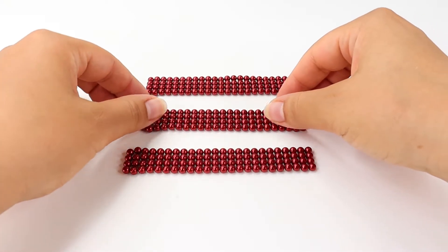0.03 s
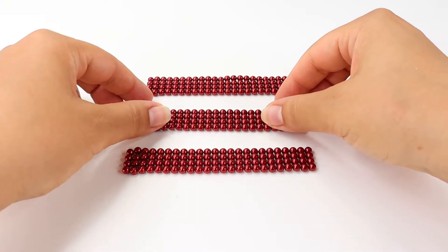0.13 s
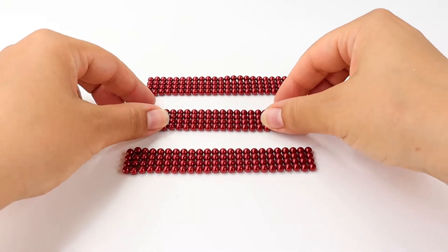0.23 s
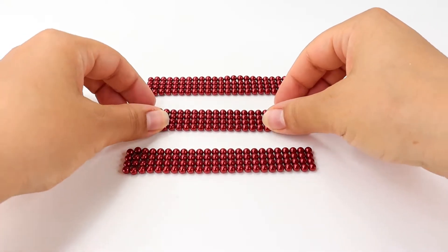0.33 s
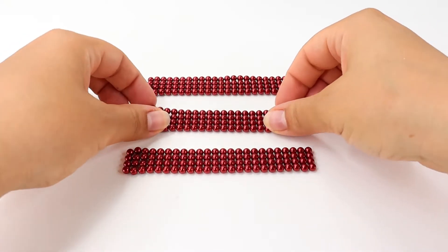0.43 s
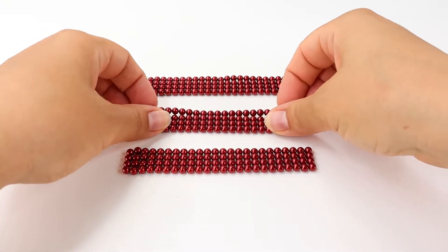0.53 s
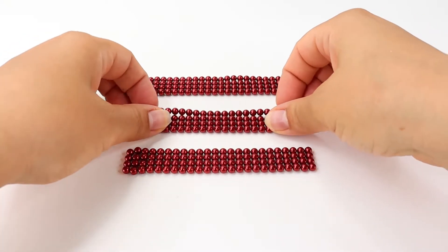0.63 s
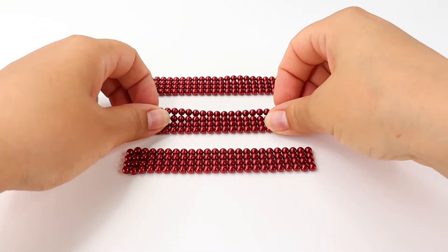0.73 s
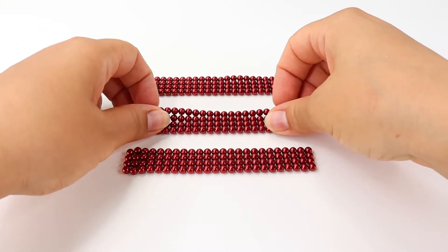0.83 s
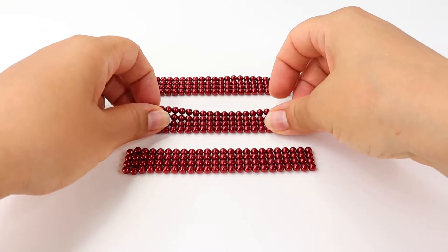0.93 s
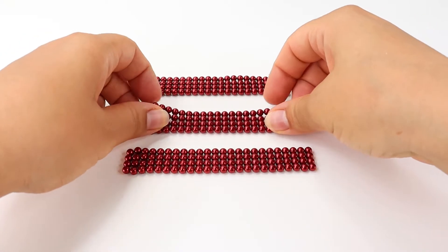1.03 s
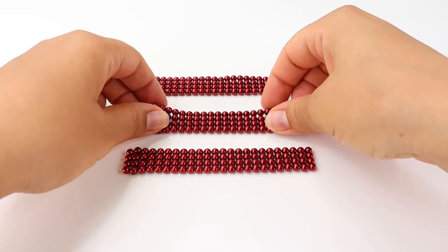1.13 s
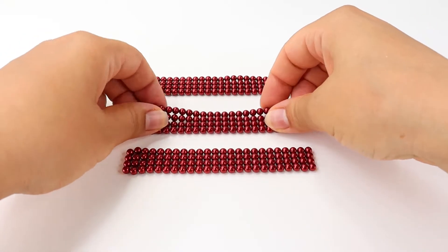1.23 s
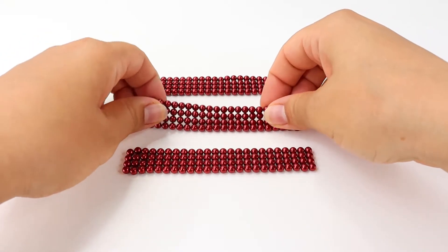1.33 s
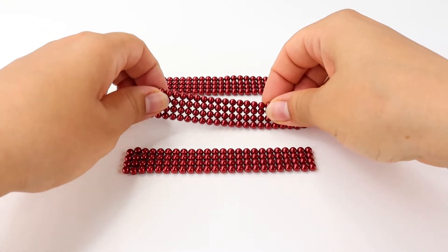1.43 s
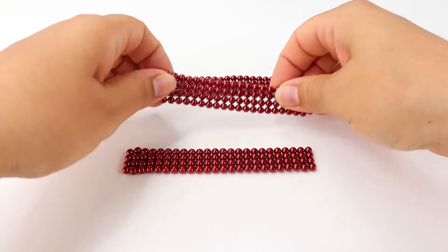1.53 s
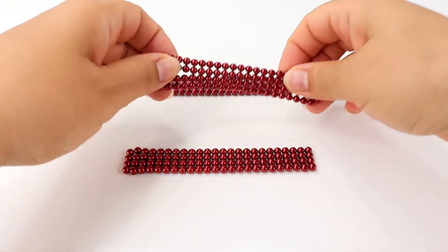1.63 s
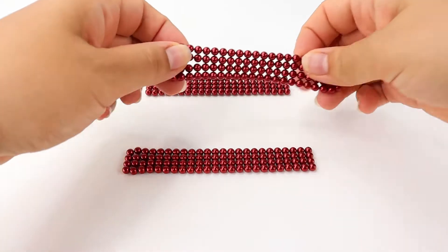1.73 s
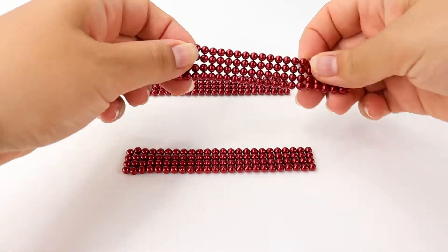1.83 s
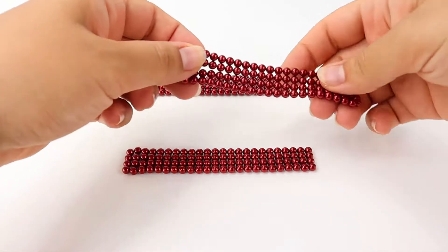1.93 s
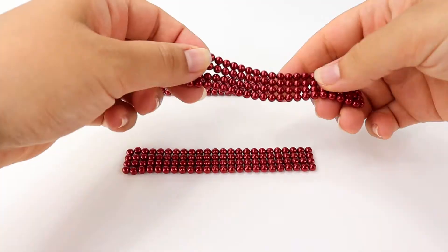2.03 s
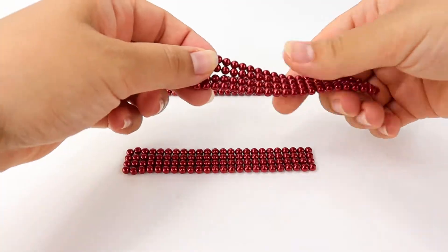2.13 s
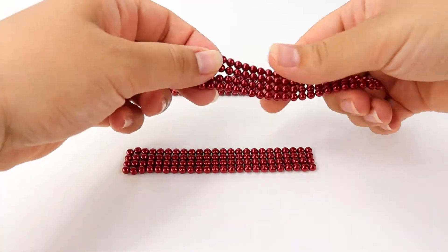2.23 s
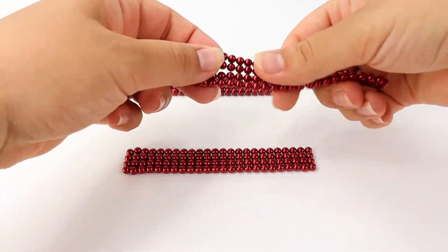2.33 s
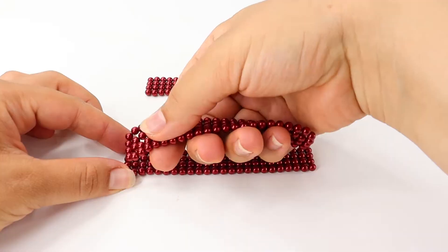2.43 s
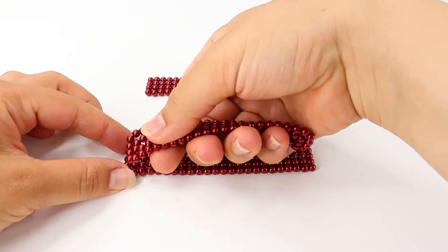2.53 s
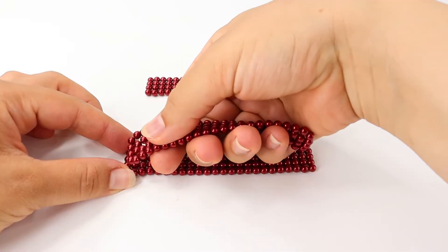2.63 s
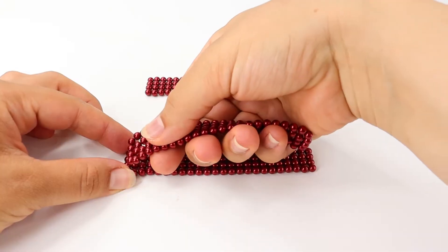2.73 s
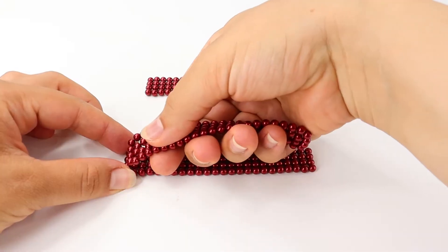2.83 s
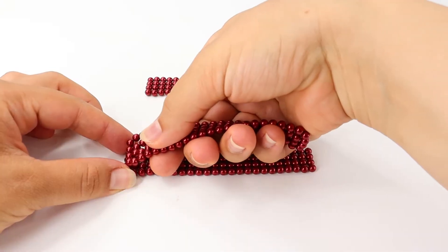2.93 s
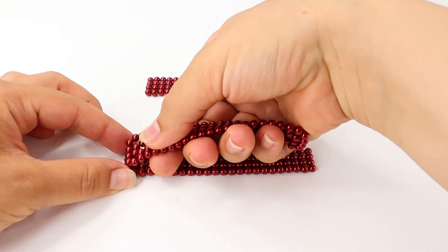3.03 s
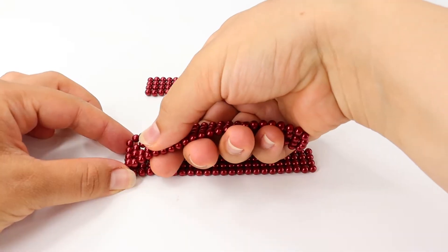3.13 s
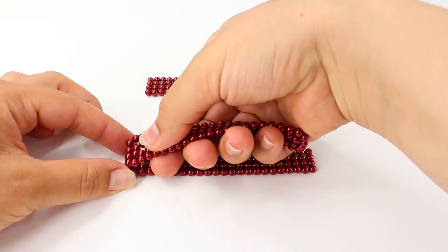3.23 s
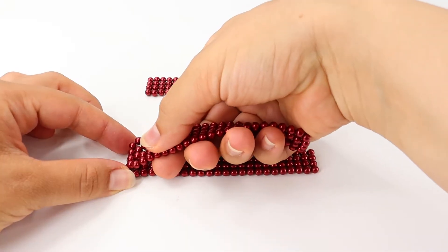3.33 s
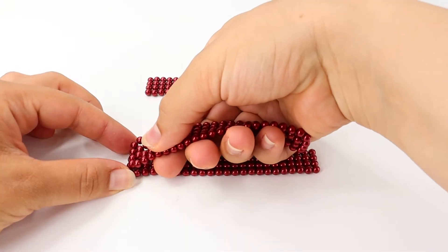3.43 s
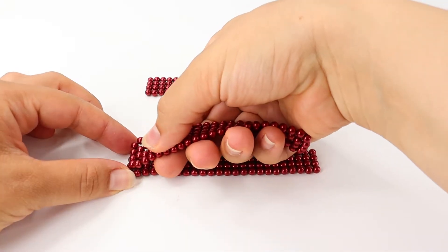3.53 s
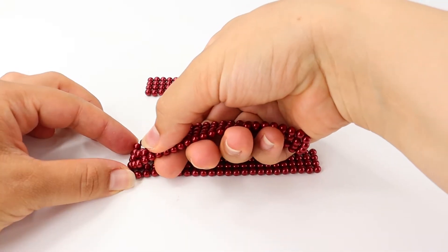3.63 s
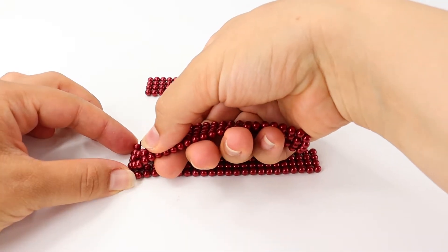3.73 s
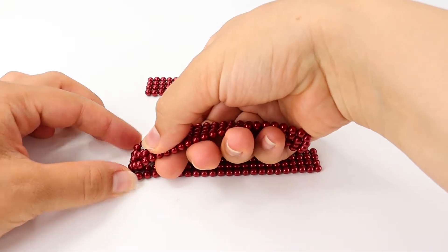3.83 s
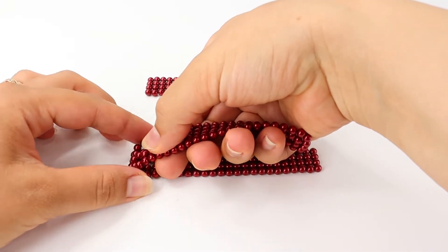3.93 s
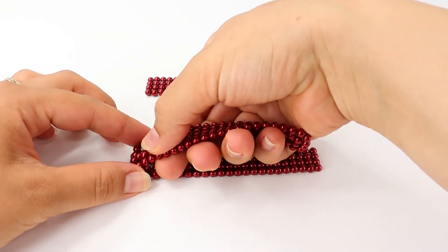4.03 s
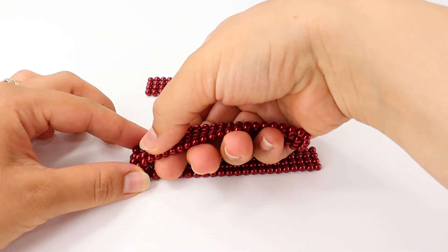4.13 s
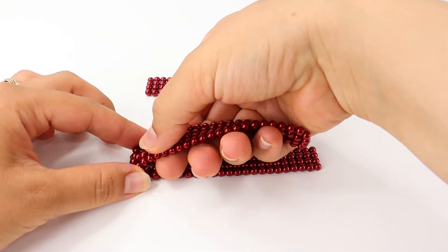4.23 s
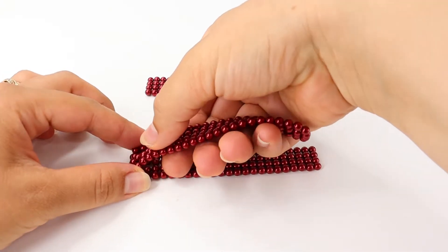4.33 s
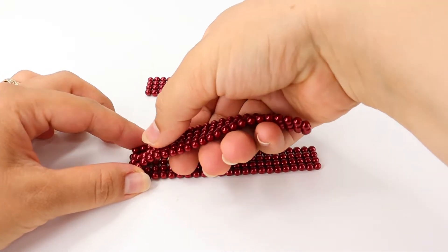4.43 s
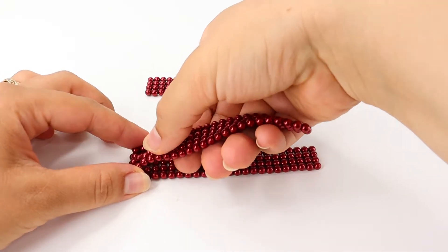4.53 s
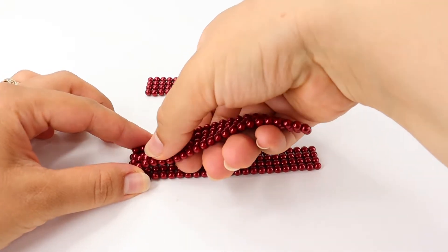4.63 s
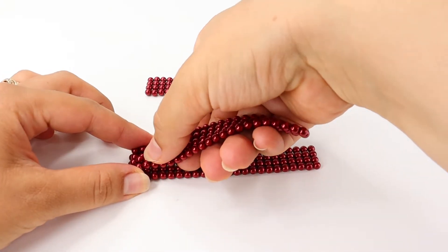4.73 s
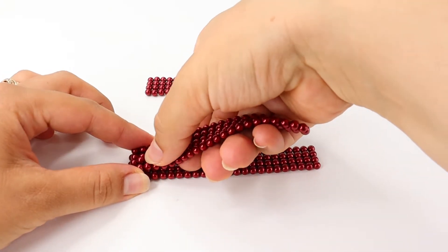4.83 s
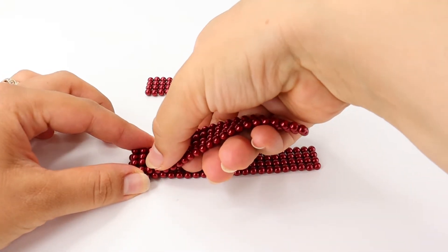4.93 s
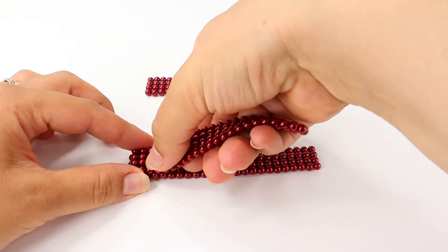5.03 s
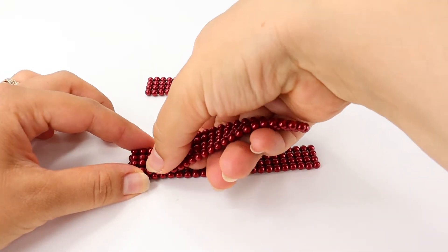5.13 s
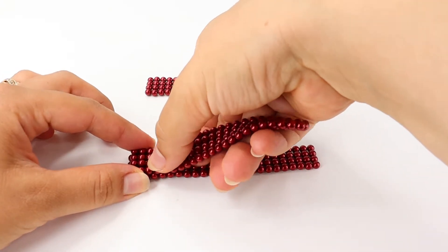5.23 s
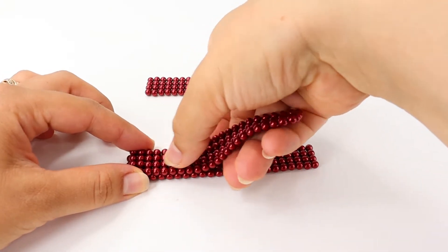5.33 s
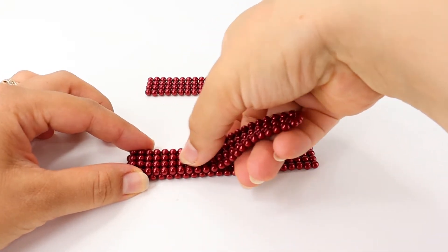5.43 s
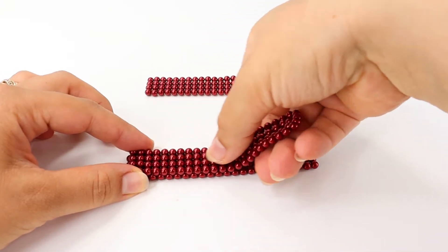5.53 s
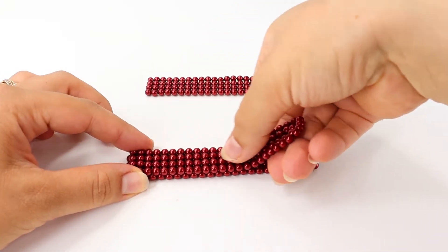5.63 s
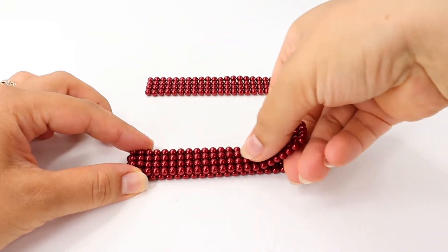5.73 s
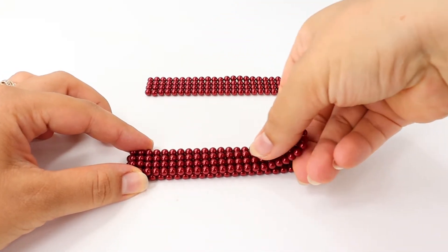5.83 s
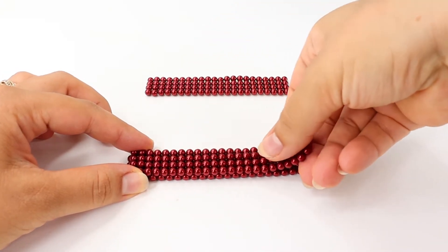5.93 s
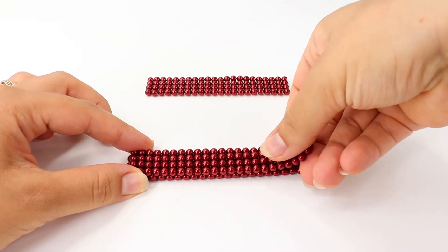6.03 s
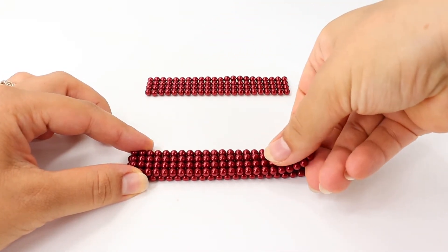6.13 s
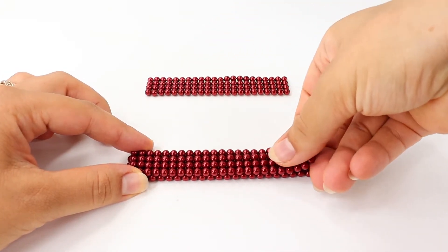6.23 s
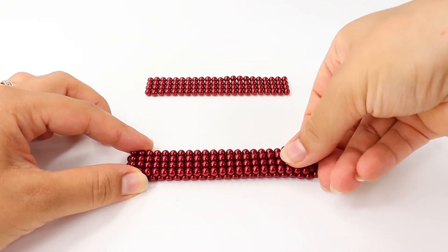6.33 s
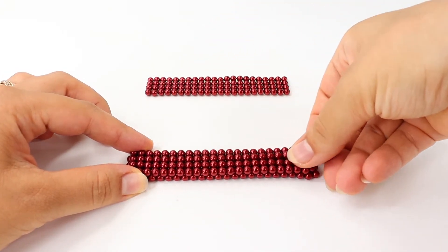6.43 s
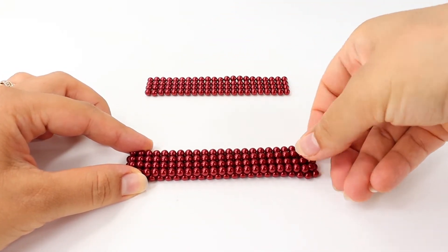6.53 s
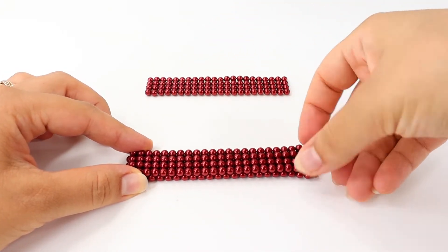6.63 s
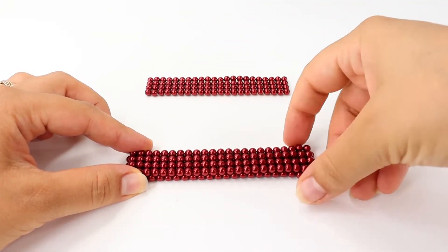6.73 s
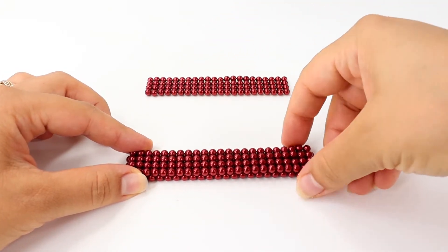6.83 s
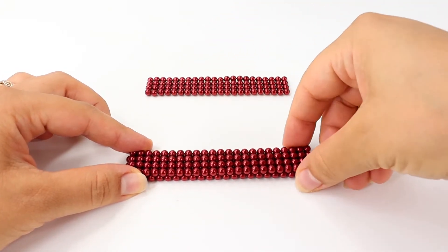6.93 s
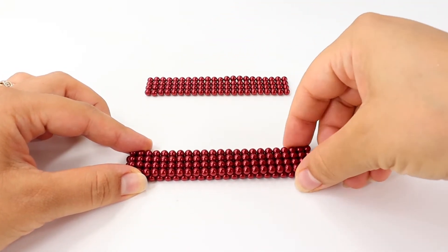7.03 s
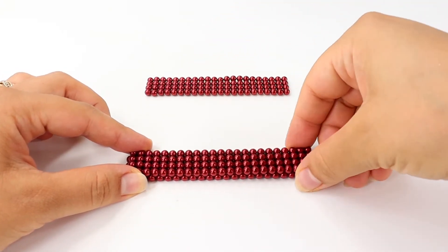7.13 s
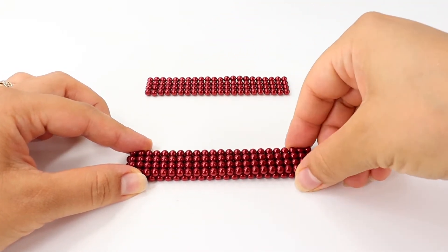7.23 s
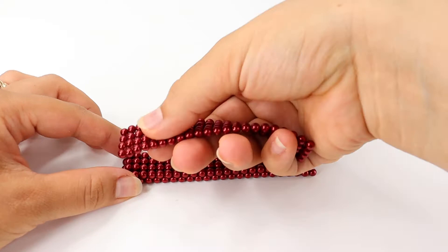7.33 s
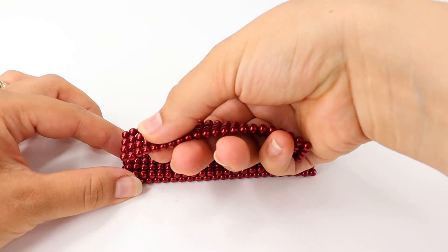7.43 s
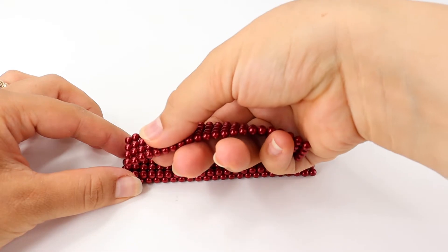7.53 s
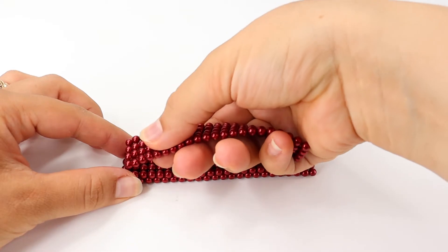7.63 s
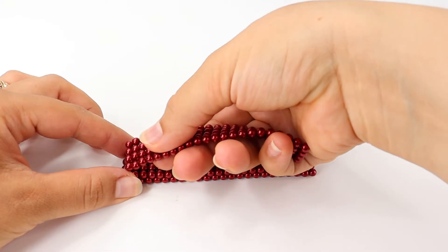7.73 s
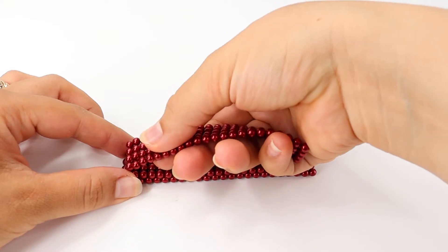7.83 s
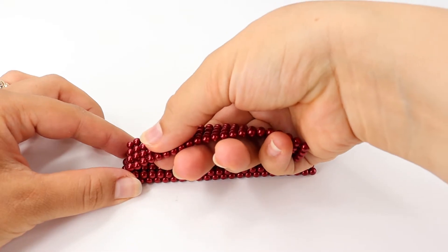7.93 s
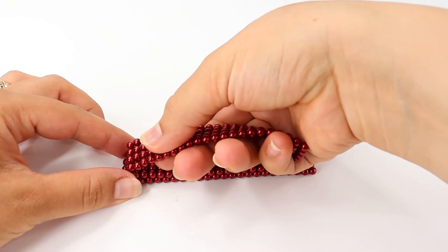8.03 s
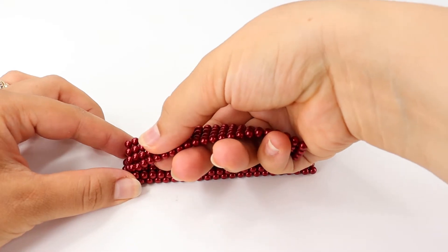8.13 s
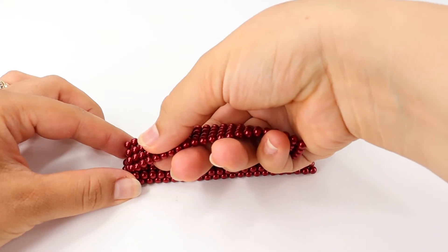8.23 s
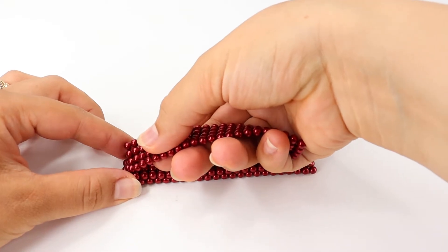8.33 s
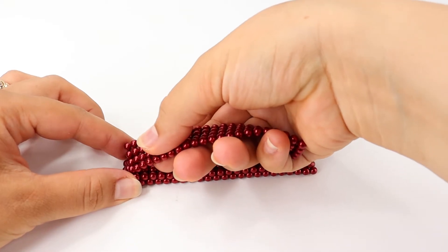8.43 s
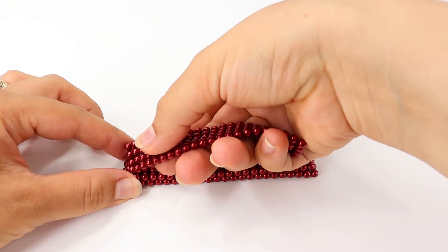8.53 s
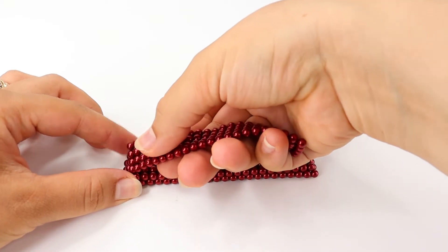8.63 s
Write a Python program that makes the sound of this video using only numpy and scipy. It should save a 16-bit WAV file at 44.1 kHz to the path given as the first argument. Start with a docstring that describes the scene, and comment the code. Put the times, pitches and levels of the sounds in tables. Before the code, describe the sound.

After faint finger rubbing and soft ticks, magnetic bead strips crack together loudly and zip shut in clattering bursts, over a faint hum.

```python
"""Magnetic balls on a table top

A fairly live room in stereo: strips of small magnetic balls are peeled off a table and stacked.
Row by row one ball snaps on and the rest land milliseconds later; noise bursts make the cracks, noise pushes
through the stack's resonances the clacks, decaying sines the table thumps. Coloured noise gives the rubbing fingers,
the scrapes and the room air; soft bumps and a faint squeak are decaying and gliding sines.
A faint hum lies beneath, and a low drone of narrow noise bands swells near the end."""
import sys
import numpy as np
from scipy import signal
from scipy.fft import rfft, irfft, next_fast_len
from scipy.io import wavfile
from scipy.ndimage import map_coordinates

SR = 44100
rng = np.random.default_rng(int(sys.argv[2]) if len(sys.argv) > 2 else 0)


def log_audio(samples):
    """Write samples as a 16-bit WAV file to the path given in sys.argv[1]."""
    # one column per channel
    frames = np.atleast_2d(samples).T
    # limit to full scale, then quantise
    limited = np.clip(frames, -1, 1)
    pcm = np.round(limited * 32767).astype(np.int16)
    wavfile.write(sys.argv[1], SR, pcm)


N = 382347  # samples


def amp(db):
    """Decibels to gain."""
    return 10 ** (np.asarray(db) / 20)


def unit(x):
    """Scale to rms 1."""
    return x / np.sqrt(np.mean(x ** 2) + 1e-20)


def along(points, hz):
    """Interpolate (frequency [Hz], value) points on a log frequency axis."""
    f, v = np.transpose(points)
    return np.interp(np.log(hz + 1), np.log(f + 1), v)


def curve(rows):
    """Interpolate (time [s], value) rows to one value per sample."""
    return np.interp(np.arange(N) / SR, *np.transpose(rows))


def wobble(rate):
    """A smooth random curve with rate knots a second."""
    knots = rng.standard_normal(int(N * rate / SR) + 4)
    return map_coordinates(knots, [np.arange(N) * rate / SR])


def swell(s, length):
    """A smooth rise to 1 and fall around time s; length is the standard deviation in seconds."""
    return np.exp(-((np.arange(N) / SR - s) / length) ** 2 / 2)


def filtered(x, response):
    """Multiply the spectrum of x by a response, a function of frequency in Hz."""
    n = x.shape[-1]
    padded = next_fast_len(n + 4096)
    spectrum = rfft(x, padded) * response(np.fft.rfftfreq(padded, 1 / SR))
    return irfft(spectrum, padded)[..., :n]


def resonances(modes, f):
    """Causal response of (centre [Hz], width [Hz], level [dB]) resonances with alternating sign."""
    total = 0
    for k, (centre, width, db) in enumerate(modes):
        damping = 1j * f * width
        total = total + (-1) ** k * amp(db) * damping / (centre * centre - f * f + damping)
    return total


# How alike diffuse sound is at the two microphones: (frequency [Hz], left-right likeness [0 to 1])
MICROPHONE_LIKENESS = [(30, .95), (100, 0.9), (300, 0.89), (600, 0.54), (1200, 0.11), (3000, 0.017),
                       (10000, 0.016)]


def diffuse(size):
    """Stereo noise from all around: alike in the bass, nearly unrelated in the treble."""
    def mid_side_gains(hz):
        angle = np.arccos(np.clip(along(MICROPHONE_LIKENESS, hz), -1, 1)) / 2
        return np.array([np.cos(angle), np.sin(angle)])

    mid, side = filtered(rng.standard_normal((2, size)), mid_side_gains)
    return np.array([mid + side, mid - side])


def at_level(x, db, span):
    """Give a hit the energy of span seconds at db."""
    energy = np.mean(np.sum(x ** 2, axis=-1))
    return x * amp(db) * np.sqrt(span * SR / energy)


def add(track, s, hit):
    """Mix a hit into a track at time s."""
    start = max(round(s * SR), 0)
    track[:, start:start + hit.shape[-1]] += hit[..., :N - start]


# Colour of the room air: (frequency [Hz], relative level [dB])
AIR_COLOUR = [(15, -58.5), (25, -44), (53, -11.5), (70, -21.5), (92, -18), (212, -14.5), (242, -12),
              (317, -17), (451, -21.5), (775, -22.5), (1020, -21.5), (1260, -22), (2050, -23.5),
              (3620, -31), (16000, -39.5)]
# Hum tones: (frequency [Hz], mean level [dB])
HUM_TONES = [(102, -69), (245, -60)]
# Course of the low drone: (time [s], level [dB])
DRONE_LEVEL = [(0, -67.5), (7.1, -70), (7.5, -56.5), (8.67, -54.5)]
# Narrow bands of the drone: (centre [Hz], width [Hz], relative level [dB])
DRONE_RESONANCES = [(71.3, 20, -0.5), (181.3, 12, -1.5), (241.6, 18.2, -4), (333.4, 58, -11.5),
                    (433, 45, -11)]


def background(air_db=-56.5):
    """Room air is diffuse noise, the hum slightly unsteady sines, the drone noise in narrow low bands."""
    t = np.arange(N) / SR
    air = amp(air_db) * unit(filtered(diffuse(N), lambda hz: amp(along(AIR_COLOUR, hz))))
    hum = 0
    for hz, db in HUM_TONES:
        level = amp(db + 1.06 * wobble(3.51)) * np.sqrt(2)
        hum = hum + level * np.sin(2 * np.pi * hz * t + 0.23 * wobble(2.25))

    def drone_colour(hz):
        tilt_db = along([(100, -8.5), (170, 0.5), (500, -1.0), (1000, -22.5)], hz)
        return resonances(DRONE_RESONANCES, hz) * amp(tilt_db)

    drone = amp(curve(DRONE_LEVEL)) * unit(filtered(diffuse(N), drone_colour))
    return air + hum + drone


# Resonances of the stack on the table: (centre [Hz], width [Hz], relative level [dB])
STACK_RESONANCES = [(630, 250, -1), (828, 142, 5), (1180, 495, 1.5), (1374, 510, -0.5), (1460, 204, 0),
                    (1916, 117, -3.5), (2973, 256, -3.5)]
# Colour of rubbing: (frequency [Hz], relative level [dB])
RUB_TONE = [(60, 5), (110, 5), (300, 4), (600, 2), (1100, 4.5), (2200, -10), (3000, -10.5), (6000, -27),
            (16000, -45.5)]


def ticks(rate=35, level_db=-8, spread_db=2.5):
    """Balls shift under the fingers, about rate times a second, and tick dully against the stack."""
    happens = rng.random(N) < rate / SR
    shifts = happens * amp(spread_db * np.clip(rng.standard_normal(N), -2, 2))
    colour = lambda hz: resonances(STACK_RESONANCES, hz) * amp(along(RUB_TONE, hz))
    return amp(level_db) * unit(filtered(shifts, colour))


# Fingers rub along the strip: (time of peak [s], half length [s], peak level [dB])
RUB_STROKES = [(0.506, 0.059, -53), (.81, 0.094, -48), (1.32, 0.24, -56.5), (1.95, 0.44, -63),
               (2.36, 0.047, -52.5), (3.375, 0.017, -54.5), (4.412, .04, -56), (4.95, 0.15, -56.5),
               (6.95, 0.16, -57.5), (8.594, 0.36, -55)]
# Brief scrapes: (time of peak [s], half length [s], centre [Hz], nominal width [Hz], peak level [dB])
BRIEF_SCRAPES = [(.93, 0.19, 2300, 400, -64.5), (1.955, 0.056, 3400, 480, -54.5),
                 (2.13, .04, 5160, 600, -63.5), (4.452, 0.056, 2500, 900, -60),
                 (6.861, .035, 2720, 2200, -53.5), (6.959, .018, 3180, 2200, -56)]
HOLD_DB = -64.5  # rubbing of fingers that only hold


def fingers(grain_db=2.5, slip_db=1.7):
    """Skin and balls rub in tiny slips; now and then a slide sings in a narrow band."""
    slips = amp(grain_db * wobble(300) + slip_db * wobble(35))
    power = amp(HOLD_DB) ** 2
    for s, length, db in RUB_STROKES:
        power = power + (amp(db) * swell(s, length)) ** 2
    rubbing = unit(filtered(diffuse(N) * slips, lambda hz: amp(along(RUB_TONE, hz))))
    out = np.sqrt(power) * (rubbing + ticks())
    for s, length, centre_hz, width_hz, db in BRIEF_SCRAPES:
        # squaring narrows the resonance, so it starts wider
        band = lambda hz: resonances([(centre_hz, width_hz * 1.35, 0)], hz) ** 2
        out += unit(filtered(diffuse(N), band)) * amp(db) * swell(s, length)
    return out


def ripple(hz, spacing_hz):
    """A random colour in dB: every contact sets a different group of balls ringing."""
    return map_coordinates(rng.standard_normal(256), [hz / spacing_hz], mode="wrap")


# A row closes in two steps, the first ball snaps on and the rest fall after it:
# (snap time [s], fall time [s], snap level [dB], brightness at 10 kHz [dB],
#  clack level before panning [dB], clack pitch [Hz], table thump level [dB])
ROW_CLOSINGS = [(0.2543, 0.0017, -50.5, -9, -45, 1190, -60), (0.519, 0.00099, -64, -14, -49, 1080, -53),
                (0.5961, 0.0019, -48.5, -6, -40, 1040, -55), (0.7356, 0.004, -52, -10, -49, 1300, -63),
                (1.2308, 0.0016, -51, 7, -43.5, 2960, -48), (1.3513, 0.0017, -58, -14, -50.5, 1400, -55.5),
                (2.2766, 0.0012, -45.5, 4, -60, 1500, -75), (2.4981, 0.00064, -31.5, -4.5, -37, 1170, -52),
                (3.663, 0.0035, -11.5, 3.5, -41, 2200, -46), (3.6739, .0047, -13.5, 1, -19, 2060, -43),
                (3.684, 0.0022, -25, 9, -51, 2000, -44), (3.9133, .0015, -39, -10, -47.5, 2200, -61),
                (4.967, 0.0076, -12, 3.5, -20.5, 1650, -43.5), (5.166, 0.0064, -37, -5, -28.5, 1400, -49),
                (5.3132, 0.00088, -31, 1, -32, 1530, -46), (5.337, .01, -45, -1, -25.5, 1370, -40),
                (5.3517, .0035, -21.5, 1, -21, 1820, -39), (5.366, 0.0047, -25, 1, -25, 1500, -35.5),
                (5.3841, 0.0038, -26.5, 3, -26, 1580, -37), (5.4472, 0.0057, -32.5, 2, -26.5, 1610, -37.5),
                (5.5119, 0.0069, -24, 2.5, -25.5, 1240, -40), (5.524, .0055, -26.5, 2, -28, 1390, -34.5),
                (5.5381, 0.0014, -24, 7, -27.5, 1200, -36), (5.5816, 0.00087, -28, 2, -32, 1107, -35.5),
                (5.593, 0.00083, -29.5, -6, -23, 1560, -49), (5.6196, 0.0079, -29.5, -0.5, -37, 1160, -37),
                (5.6381, 0.0012, -33, 6, -29.5, 1210, -35.5), (5.6766, .002, -25, -1, -30, 1205, -38.5),
                (5.7308, 0.0064, -26, 0.5, -32.5, 1100, -54), (5.7468, 0.0011, -29.5, -6, -26, 1600, -39),
                (5.7703, 0.00098, -33, -1, -28, 1210, -49), (5.7797, 0.0055, -26.5, 3, -33, 1440, -38.5),
                (5.8573, .0015, -32, -1.5, -44, 1400, -45.5), (5.8915, 0.0011, -45, -7, -36.5, 1460, -41.5),
                (5.9008, 0.0028, -27.5, 5.5, -32.5, 1220, -37),
                (6.1047, 0.00106, -33, 5.5, -39.5, 1866, -46), (6.1857, 0.0066, -23, 3.5, -32, 1570, -42),
                (6.2675, 0.0037, -27, 3, -34, 1140, -41), (6.323, 0.0036, -28.5, 2.5, -39, 1340, -38),
                (6.3371, 0.0017, -22.5, 4.5, -34, 1350, -37), (6.3516, .002, -28, -0.5, -44, 1280, -40),
                (6.4016, 0.00063, -13.5, 1.5, -23, 3130, -55), (6.407, 0.0081, -22.5, 8, -32, 1830, -37),
                (6.5001, 0.0024, -25, 4, -23.5, 1500, -36.5),
                (6.5165, 0.0046, -19.5, -1.5, -18.5, 1654, -32.5),
                (6.684, 0.0031, -54, -18, -46, 2130, -80), (6.7677, 0.0013, -59, -14, -45, 1730, -83),
                (6.8031, 0.0012, -43.5, -9, -63, 2000, -79), (7.0389, 0.0011, -47.5, -7, -52, 1500, -57),
                (7.235, 0.0009, -54, -10, -55, 1520, -62), (8.1817, 0.00101, -52, -8, -40.5, 1765, -56),
                (8.1912, 0.0011, -32.5, 0, -39.5, 2490, -44.5), (8.339, 0.0011, -51, -1, -41, 1580, -65),
                (8.3426, 0.00089, -23.5, -2.5, -27.5, 1470, -55)]
# Colour of a snap: (frequency [Hz], relative level [dB])
SNAP_TONE = [(300, -30.5), (900, -8.5), (1600, 3.5), (2250, -3), (2900, -1.5), (4000, 1), (5300, -2.5),
             (6500, 1.5), (8200, -2.5), (10000, -2.5), (12000, 0), (16000, -2.5)]
FOLLOW_CRACK_DB = -4  # crack of the landing against the snap
FULL_FALL_S = 0.0039  # after a shorter fall the landing cracks more softly
LEAN_DB, LEAN_SCATTER_DB = -5.5, 6  # left minus right, and its change from crack to crack


def snaps(crack_t60=0.0049, chatter_t60=0.036, chatter_db=-6.0, grain_db=7.5, alike=0.43, ripple_db=1.2):
    """Snap and landing each crack sharply, then neighbouring balls chatter unevenly for milliseconds."""
    out, t = np.zeros((2, N)), np.arange(SR // 20) / SR
    for s, fall, db, bright_db, *_ in ROW_CLOSINGS:
        landing_db = FOLLOW_CRACK_DB + 10 * np.log10(np.clip(fall / FULL_FALL_S, .1, 1))
        for delay, step_db in (0, 0), (fall, landing_db):
            noise = rng.standard_normal((4, len(t)))  # left, right, shared, grain levels
            grains = amp(grain_db * np.interp(t * 1200, np.arange(len(t)), noise[3]))
            chatter = grains * amp(chatter_db - 60 * t / chatter_t60)
            fade = amp(-60 * t / crack_t60) + chatter

            def colour(hz):
                # harder contacts reach higher
                hardness_db = bright_db * along([(1000, -0.45), (4000, -0.36), (10000, 1.0)], hz)
                uneven_db = ripple_db * ripple(hz, spacing_hz=483.0)
                return amp(along(SNAP_TONE, hz) + hardness_db + uneven_db)

            crack = filtered(noise[:2] + alike * noise[2], colour) * fade
            half_lean_db = (LEAN_DB + LEAN_SCATTER_DB * rng.standard_normal()) / 2
            panned = crack * amp([[half_lean_db], [-half_lean_db]])
            add(out, s + delay, at_level(panned, db + step_db, 0.0026))
    return out


LEAD_CLACK_DB = -8.5  # clack of the snap against the landing


def clacks(blow_t60=0.012, settle_t60=0.14, settle_db=-19, octaves=0.69, ring_db=3, apart=0.44, shift=0.047):
    """The snap pushes the stack lightly, the landing hard; its resonances shift from hit to hit."""
    out, t = np.zeros((2, N)), np.arange(SR // 10) / SR
    fade = amp(-60 * t / blow_t60) + amp(settle_db - 60 * t / settle_t60)
    for s, fall, _, _, db, pitch_hz, _ in ROW_CLOSINGS:
        for delay, step_db in (0, LEAD_CLACK_DB), (fall, 0):
            noise = rng.standard_normal((3, len(t)))  # left, right, shared
            stretch = np.exp(shift * rng.standard_normal())
            # short waves reach the two microphones differently
            force = noise[2] + apart * filtered(noise[:2], lambda hz: np.minimum(hz / 1300, 2))
            pitch_band = lambda hz: np.exp(-(np.log2((hz + 1) / pitch_hz) / octaves) ** 2 / 2)
            push = filtered(force, pitch_band) * fade
            stack = lambda hz: 0.27 + amp(ring_db) * resonances(STACK_RESONANCES, hz * stretch)
            add(out, s + delay, at_level(filtered(push, stack), db + step_db, 0.0061))
    return out * amp([[-2], [1.4]])  # to the right of the microphones


# Modes of the table top: (frequency [Hz], relative level [dB], time to fall 60 dB [s])
TABLE_MODES = [(101.7, -9, 0.46), (165, -12, 0.163), (226.3, -12, 0.18), (268.6, -3.5, 0.18),
               (309.6, -2, 0.21), (346, -1, 0.083), (417, -1, 0.1), (457, 3, 0.11), (553, -6.5, 0.061),
               (621.7, -0.5, 0.12), (707, -13.5, 0.063), (784, -1.5, 0.054), (863, 1.5, 0.08),
               (1020, -3, 0.038)]


def thumps(attack=0.002, scatter_db=2.0, mistune=.02):
    """Every landing rings the table top, at new strengths as the place of contact moves."""
    out, t = np.zeros((2, N)), np.arange(SR // 3) / SR
    hz, level_db, t60 = np.transpose(TABLE_MODES)[:, :, None]
    for s, fall, *_, db in ROW_CLOSINGS:
        size, detune, phase = rng.standard_normal((3, len(TABLE_MODES), 1))
        loaded_hz = hz * (1 + mistune * detune)
        fade = amp(level_db + scatter_db * size - 60 * t / t60)
        modes = fade * np.sin(2 * np.pi * loaded_hz * t + np.pi * phase)
        thump = modes.sum(0) * (1 - np.exp(-t / attack))
        add(out, s + fall, at_level(thump, db, 0.02))
    return out


# Decay of the room: (frequency [Hz], time to fall 60 dB [s])
ROOM_DECAY = [(120, 0.8), (500, 0.41), (1400, 0.65), (3700, 0.54), (9000, 0.41), (15000, 0.31)]
# Strength of the room's answer: (frequency [Hz], gain [dB])
ROOM_ANSWER = [(100, -7.5), (400, 2), (1400, -6), (3500, -8), (7000, -11.5), (15000, -11.5)]


def room(x, build=0.00278):
    """The walls answer after milliseconds with diffuse noise that fades at its own pace in each band."""
    out, step = np.zeros((2, N)), SR // 4
    # a fresh random tail every quarter second keeps the room's colour even
    for start in range(0, N, step):
        hz, t, z = signal.stft(diffuse(SR * 2 // 3), SR, nperseg=256)
        fade = amp(-60 * t / along(ROOM_DECAY, hz)[:, None]) * (1 - np.exp(-(t / build) ** 2))
        fade /= np.sqrt(np.sum(fade ** 2, axis=1, keepdims=True) * t[1] * SR)  # equal energy per band
        gain = amp(along(ROOM_ANSWER, hz))[:, None]
        tail = signal.istft(z * fade * gain, SR, nperseg=256)[1]
        add(out, start / SR, signal.fftconvolve(x[:, start:start + step], tail, axes=1))
    return out


# Soft bumps that ring the stack or table: (time [s], frequency [Hz], level [dB])
SOFT_BUMPS = [(.455, 311, -50.5), (2.499, 648, -36.5), (3.452, 894, -45), (5.903, 322, -37),
              (6.39, 475, -41.5), (6.405, 104.4, -45.5), (8.191, 312.5, -42)]
BUMP_CYCLES = 51  # cycles until a bump has fallen 60 dB


def bumps(waver=0.03):
    """A soft contact swells over about one cycle and dies with its mode, low ones last."""
    out, t = np.zeros((2, N)), np.arange(SR // 2) / SR
    for s, hz, db in SOFT_BUMPS:
        cycles = hz * t
        drift = np.cumsum(rng.standard_normal(len(t))) * waver * np.sqrt(hz / 3000)
        fade = (1 - np.exp(-cycles)) * amp(-60 * cycles / BUMP_CYCLES)
        ring = np.sin(2 * np.pi * cycles + drift) * fade
        add(out, s, at_level(ring, db, BUMP_CYCLES / hz / 7))
    return out


def squeak(s=4.68, length=0.08, db=-62, rest_hz=1565, rise_hz=85):
    """A fingertip squeaks faintly on the balls; pitch and level follow its pressure."""
    pressure = swell(s, length)
    hz = (rest_hz + rise_hz * pressure) * (1 + 0.0111 * wobble(110))
    return np.sqrt(2) * amp(db) * pressure * np.sin(2 * np.pi * np.cumsum(hz) / SR)


def scene():
    """Balls and table in the room: snaps and clacks lean right, thumps, bumps and squeak are central."""
    bright, body = snaps(), clacks() + thumps()
    walls = room(bright + amp(-1.5) * body)
    return bright + body + walls + bumps() + fingers() + squeak() + background()


def record(dry):
    """The recorder cuts the deepest bass, clips at full scale and keeps nothing far above its band limit."""
    top_hz = 16200
    lean = filtered(dry, lambda hz: hz ** 4 / (hz ** 4 + 36 ** 4))
    return filtered(np.clip(lean, -1, 1), lambda hz: 1 / (1 + (hz / top_hz) ** 120))


dry = scene()
out = record(dry)
log_audio(out)
```